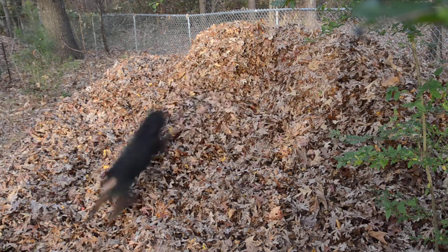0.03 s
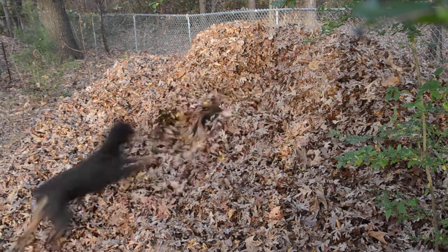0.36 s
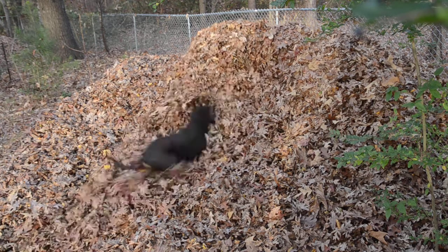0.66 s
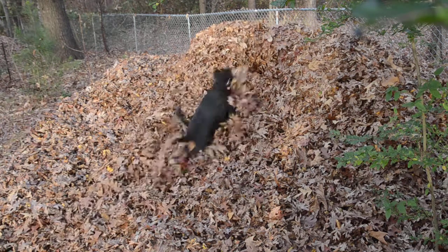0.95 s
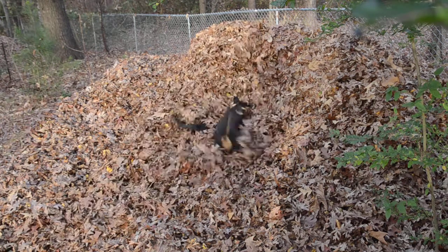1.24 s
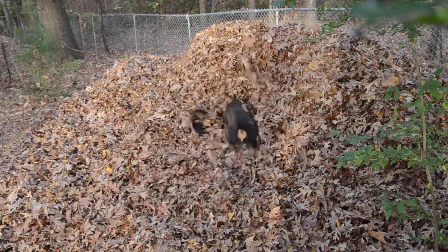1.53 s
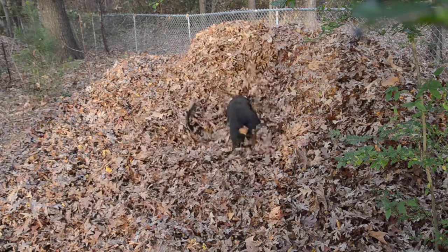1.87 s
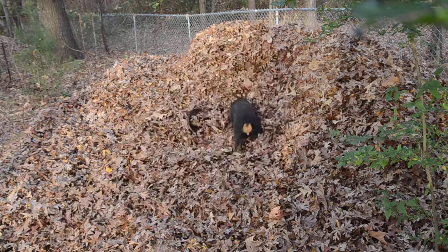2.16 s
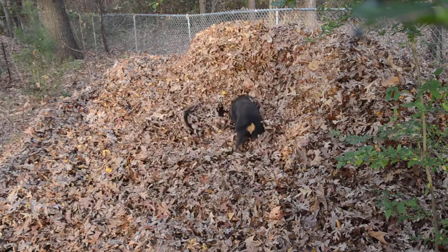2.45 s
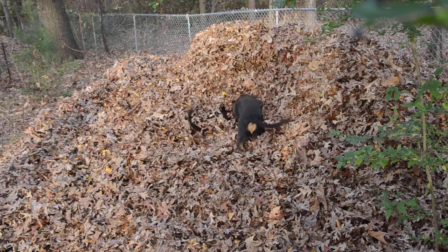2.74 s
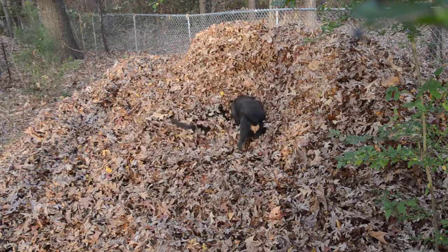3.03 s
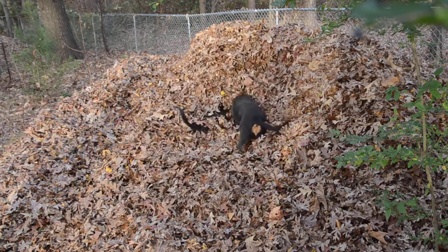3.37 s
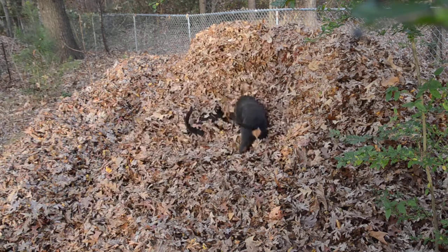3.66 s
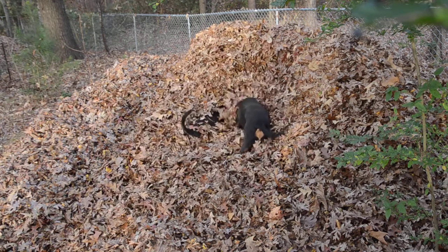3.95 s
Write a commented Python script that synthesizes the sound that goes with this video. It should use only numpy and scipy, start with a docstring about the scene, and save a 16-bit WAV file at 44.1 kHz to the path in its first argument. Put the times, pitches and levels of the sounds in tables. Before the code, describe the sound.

Loud crunching of dry leaves under leaping dogs, easing to soft pawing and snapping stems.

```python
"""Two dogs bound into a deep pile of dry leaves: thousands of tiny cracks merge into a crunch,
bright on the leaps, dull when buried, with low puffs as their weight sinks in.
From 2.1 s they stand in the pile, nosing and pawing, much quieter; now and then a stem snaps.
Behind it all: outdoor air and a distant engine drone, a second engine taking over near 3 s."""
import sys
import numpy as np
from scipy import signal
from scipy.fft import rfft, irfft
from scipy.io import wavfile

SR = 44100
rng = np.random.default_rng(int(sys.argv[2]) if len(sys.argv) > 2 else 0)


def wav_out(sig):
    """Save sig, one row per channel (or a flat mono array), as 16-bit PCM at SR to the path in sys.argv[1]."""
    wavfile.write(sys.argv[1], SR, np.round(np.clip(np.atleast_2d(sig).T, -1, 1) * 32767).astype(np.int16))


N = 176400
TIME_S = np.arange(N) / SR

# leaf stirring, leaps then nosing: t/s, stir level/dB, treble offset/dB
STIR_LEAPS = [(0.0, -38.5, -3.5), (0.02, -37.5, -6), (0.05, -49, -6), (0.06, -42, -8.5), (0.15, -29, -7),
              (0.26, -27.5, -11), (0.36, -35, -12.5), (0.4, -38, -8.5), (0.63, -29.5, -8.5),
              (0.71, -33.5, -12.5), (0.77, -33, -11.5), (0.85, -41.5, -8.5), (1.23, -35, -12.5),
              (1.36, -43, -12.5), (1.53, -40, -12.5), (1.74, -42, -10.5), (1.93, -43.5, -13.5),
              (1.96, -39.5, -16), (2.08, -49.5, -12.5), (2.09, -53, -9), (2.1, -50, -11)]
STIR_NOSING = [(2.14, -52.5, -12), (2.418, -56, -13.5), (2.496, -53.5, -15), (2.506, -55, -16),
               (2.626, -55, -17), (2.662, -49, -14.5), (2.926, -49.5, -9), (3.056, -54, -14),
               (3.252, -50, -15.5), (3.3, -55.5, -14), (3.352, -52.5, -11), (3.44, -53, -14),
               (3.6, -50.5, -13), (4.0, -49.5, -13)]
# leaf crack spectrum: f/Hz, relative level/dB
LEAF_SPECTRUM = [(71, -48), (120, -15.5), (170, -24), (221, -16.5), (294, -10.5), (390, -12.5), (459, -9),
                 (519, -7.5), (719, -2.5), (846, -1.5), (1350, 0.5), (1690, -1.5), (2200, -6), (3730, -5.5),
                 (4760, -12), (9320, -18), (11900, -16.5), (14000, -23), (15500, -30)]
# paw swipes through the top leaves: t/s, crunch level/dB, treble level/dB
PAW_SWIPES = [(.125, -32, -36), (.47, -44.5, -39), (1.235, -40.5, -56), (1.51, -41, -48), (1.79, -43, -48),
              (1.99, -48, -62), (2.662, -60, -69), (2.752, -44.5, -58), (2.79, -54, -58), (2.915, -47, -61),
              (3.345, -49, -54.5), (3.96, -47, -55)]
# stems and stiff leaves breaking: t/s, peak level/dB, centre f/Hz
STEM_SNAPS = [(.254, -15, 2580), (.281, -23, 7000), (0.936, -40, 1800), (2.078, -35, 1600),
              (2.100, -36, 1400), (2.659, -36, 3000), (2.709, -42, 450), (2.721, -45, 1490),
              (2.790, -47, 1200), (2.889, -28.5, 1700), (2.894, -37, 1110), (2.911, -34, 1400),
              (3.002, -48, 1800), (3.487, -47, 1600), (3.622, -34.5, 1383), (3.977, -34, 1300)]
# weight sinking into the pile: t/s, level/dB
PILE_PUSHES = [(.15, -51), (.24, -52.5), (.55, -51), (.70, -56), (1.20, -55), (1.95, -53.5), (2.702, -57.5),
               (2.90, -61.5), (3.95, -61)]
# distant engines: t/s, firing f/Hz, fundamental level/dB, octave level/dB
ENGINE_EARLY = [(0, 89.6, -63, -77), (.4, 87, -59, -66), (.9, 89.5, -55, -70), (1.4, 91.5, -57, -66.5),
                (1.75, 91.2, -65, -68), (2.0, 91.8, -59, -69.5), (2.5, 90, -88, -73), (2.8, 93, -85, -90)]
ENGINE_LATE = [(2.85, 73, -80, -90), (3.05, 69.2, -57.5, -74), (3.3, 69.1, -59, -75), (3.7, 70.1, -61, -62),
               (4, 68.2, -58, -65)]
# outdoor air and far traffic: f/Hz, relative level/dB
AIR_SPECTRUM = [(22, -24), (42, -10.5), (62, -1), (110, 0.5), (160, -3), (275, -8.5), (450, -2.5),
                (760, -0.5), (1050, -1.5), (1700, -7), (2200, -13), (3700, -17), (4600, -20),
                (10800, -28.5), (15500, -38)]

CRUNCH_DB, TREBLE_DB, CROSSOVER_HZ = 1.5, 3, 4140
CRACKS_PER_S, REFERENCE_DB, RATE_EXPONENT = 3500, -38.5, .55   # rate at the reference stir level
SIZE_SPREAD_DB, FLICKER_DB, FLICKER_HZ = 1, -0.21, 45
RUB_DB, SCATTER_DB, SCATTER_T60_S = 3.5, -1.5, 0.071


def leaves():
    """Crunch of the whole pile plus treble escaping from surface leaves; paw swipes add to both."""
    stir_db, treble_offset_db = curves(list(STIR_LEAPS) + list(STIR_NOSING))
    crackle = colour(cracks(stir_db), LEAF_SPECTRUM)
    crunch, treble = map(unit_rms, split(crackle, CROSSOVER_HZ))
    crunch_gain = from_db(stir_db + CRUNCH_DB)
    treble_gain = from_db(stir_db + TREBLE_DB + treble_offset_db)
    for t_s, crunch_db, treble_db in PAW_SWIPES:
        stroke = swell(t_s, attack_s=.007, release_s=.023)
        crunch_gain = np.hypot(crunch_gain, from_db(crunch_db) * stroke)
        treble_gain = np.hypot(treble_gain, from_db(treble_db) * stroke)
    return crunch_gain * crunch + treble_gain * treble


def cracks(stir_db):
    """Tiny cracks, their scatter in the pile, and leaves rubbing. Stirring sets density, not level."""
    rate_per_s = CRACKS_PER_S * from_db(RATE_EXPONENT * (stir_db - REFERENCE_DB))
    onsets = rng.random(N) < rate_per_s / SR
    size_db = SIZE_SPREAD_DB * np.minimum(rng.exponential(1, N), 4)
    impulses = onsets * from_db(size_db) / np.sqrt(rate_per_s)
    edges_hz = [60, 700, 1400, 2800, 5600, 11000, 19000]   # each crack: random strength per band
    bands = [band(impulses * rng.standard_normal(N), *span) for span in zip(edges_hz, edges_hz[1:])]
    direct = unit_rms(sum(bands))
    energy_kept = from_db(-60 / (SCATTER_T60_S * SR)) ** 2
    scatter_energy = signal.lfilter([1], [1, -energy_kept], impulses ** 2)
    scatter = from_db(SCATTER_DB) * unit_rms(np.sqrt(scatter_energy) * rng.standard_normal(N))
    rub = from_db(RUB_DB) * rng.standard_normal(N)
    return (direct + scatter + rub) * from_db(FLICKER_DB * drift(FLICKER_HZ))


def snaps(t60_s=0.021, edge_ratio=1.38):
    """Stems: a sharp break, then brief splintering, each in its own band."""
    out = np.zeros(N + SR)
    decay = from_db(-60 * TIME_S[:SR // 2] / t60_s)
    for t_s, peak_db, centre_hz in STEM_SNAPS:
        burst = rng.standard_normal(len(decay)) * decay
        burst[0] += 9   # the break
        burst = band(burst, centre_hz / edge_ratio, centre_hz * edge_ratio)
        start = int(t_s * SR)
        out[start:start + len(burst)] += from_db(peak_db) * burst / np.abs(burst).max()
    return out[:N]


def pushes():
    """Soft low puffs as paws and chests compress the pile."""
    weight = sum(from_db(db) * swell(t_s, attack_s=.03, release_s=.11) for t_s, db in PILE_PUSHES)
    return weight * unit_rms(band(rng.standard_normal(N), low_hz=110, high_hz=447))


def engine(rows, waver_db, waver_hz=15):
    """Only the two lowest exhaust harmonics carry this far, wavering on the way."""
    firing_hz, *levels_db = curves(rows)
    phase = 2 * np.pi * np.cumsum(firing_hz) / SR
    return sum(np.sqrt(2) * from_db(db + waver_db * drift(waver_hz)) * np.sin(harmonic * phase)
               for harmonic, db in enumerate(levels_db, 1))


def air(level_db=-51.5):
    """Steady noise of outdoor air and far traffic."""
    return from_db(level_db) * unit_rms(colour(rng.standard_normal(N), AIR_SPECTRUM))


def from_db(db):
    """Decibels to gain."""
    return 10 ** (np.asarray(db) / 20)


def unit_rms(x):
    """Scale to unit power."""
    return x / np.sqrt(np.mean(x ** 2) + 1e-20)


def curves(rows):
    """Table columns, interpolated per sample."""
    t_s, *columns = np.transpose(rows)
    return [np.interp(TIME_S, t_s, column) for column in columns]


def swell(peak_s, attack_s, release_s):
    """Exponential rise to 1, exponential fall."""
    return np.exp(-np.maximum((peak_s - TIME_S) / attack_s, (TIME_S - peak_s) / release_s))


def drift(rate_hz):
    """Smooth random motion, unit RMS."""
    pole = np.exp(-2 * np.pi * rate_hz / SR)
    smooth = signal.lfilter([1], [1, -2 * pole, pole * pole], rng.standard_normal(N + SR))
    return unit_rms(smooth[SR:])


def band(x, low_hz, high_hz):
    """Gentle band-pass."""
    return signal.sosfilt(signal.butter(2, [low_hz, high_hz], "band", fs=SR, output="sos"), x + 1e-18)


def split(x, hz):
    """Parts below and above a crossover."""
    return [signal.sosfilt(signal.butter(7, hz, kind, fs=SR, output="sos"), x)
            for kind in ("low", "high")]


def colour(x, spectrum):
    """Minimum-phase filter along a spectrum; rolls off below its first point."""
    hz, db = np.transpose(spectrum)
    size = 2 * N
    bins_hz = np.maximum(np.arange(N + 1) * SR / size, 1)
    gain = from_db(np.interp(np.log(bins_hz), np.log(hz), db))
    gain *= np.minimum(bins_hz / hz[0], 1) ** 2
    cepstrum = irfft(np.log(gain))
    cepstrum[1:N] *= 2
    cepstrum[N + 1:] = 0
    return irfft(rfft(x, size) * np.exp(rfft(cepstrum)))[:N]


def scene():
    """Dogs in the leaves over the distant background, mono."""
    outdoors = air()
    rustle = leaves() + snaps() + pushes()
    engines = engine(ENGINE_EARLY, waver_db=2.5) + engine(ENGINE_LATE, waver_db=1.6)
    return (rustle + engines + outdoors)[None]


def record(dry):
    """Steep low-pass."""
    cutoff_hz = 15650
    return signal.sosfilt(signal.ellip(12, .1, 80, cutoff_hz, fs=SR, output="sos"), dry)


dry = scene()
out = record(dry)
wav_out(out)
```